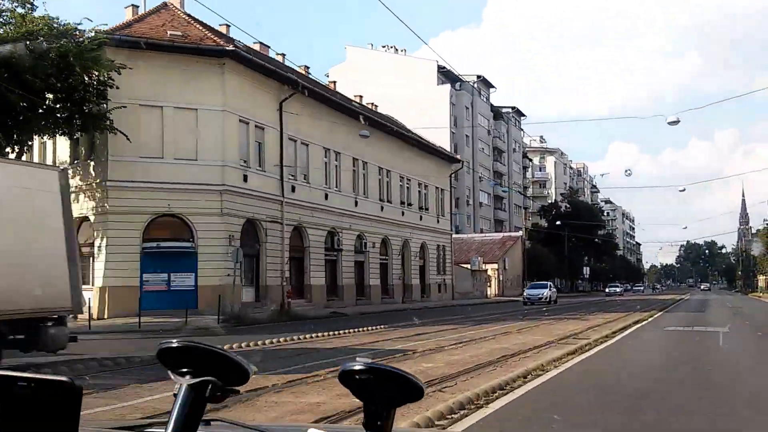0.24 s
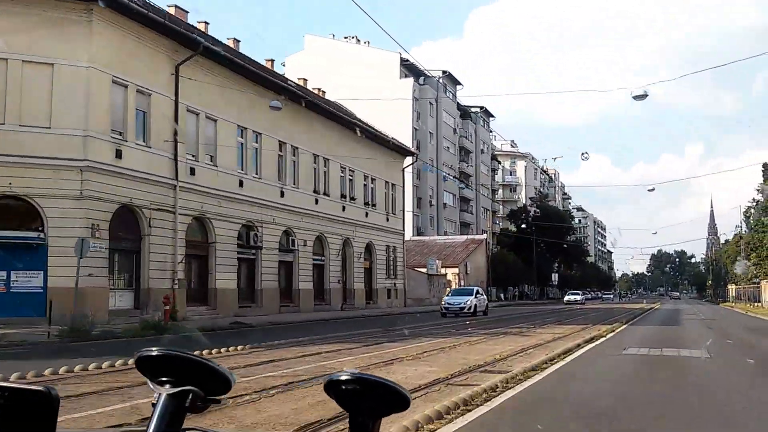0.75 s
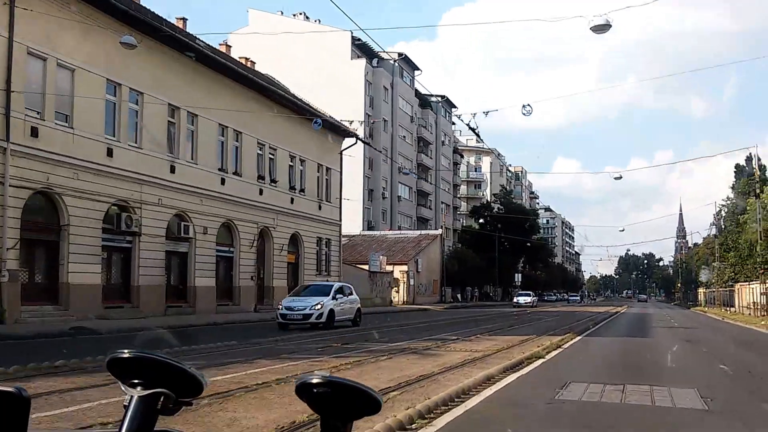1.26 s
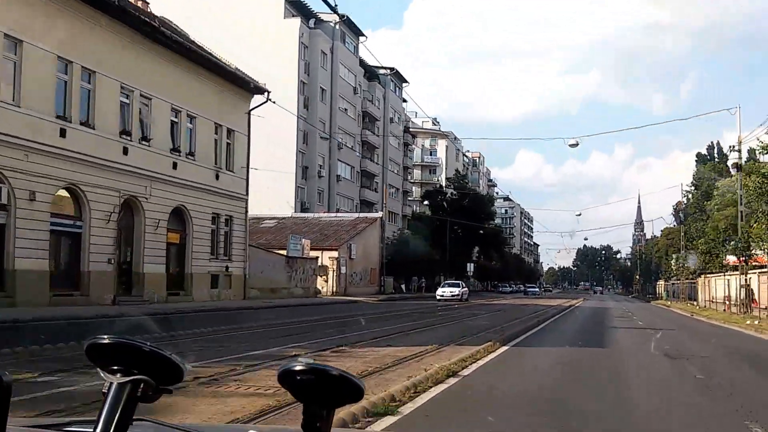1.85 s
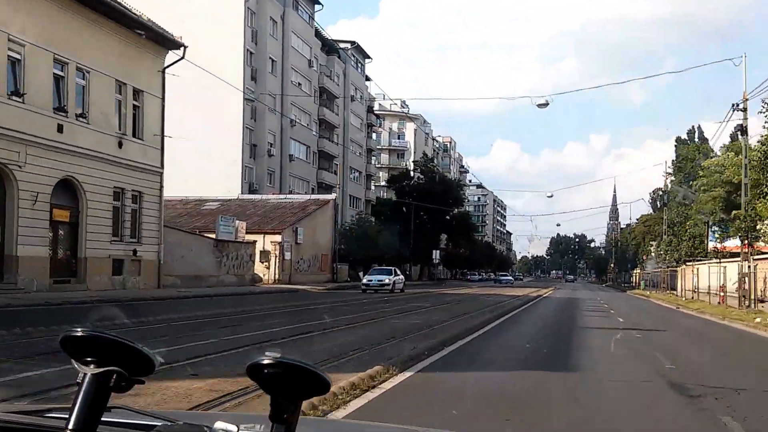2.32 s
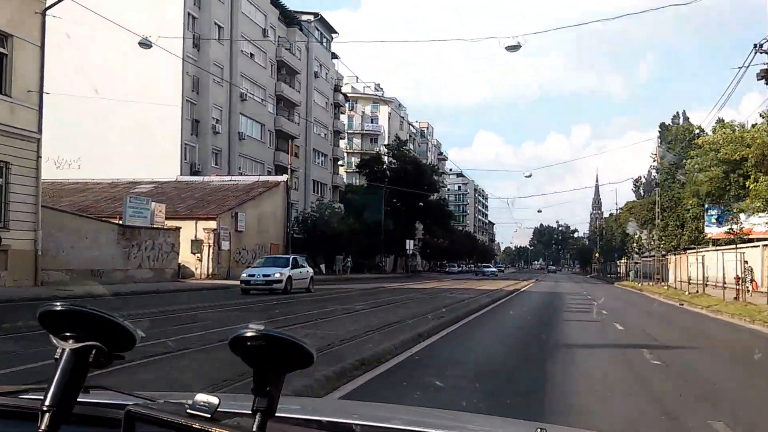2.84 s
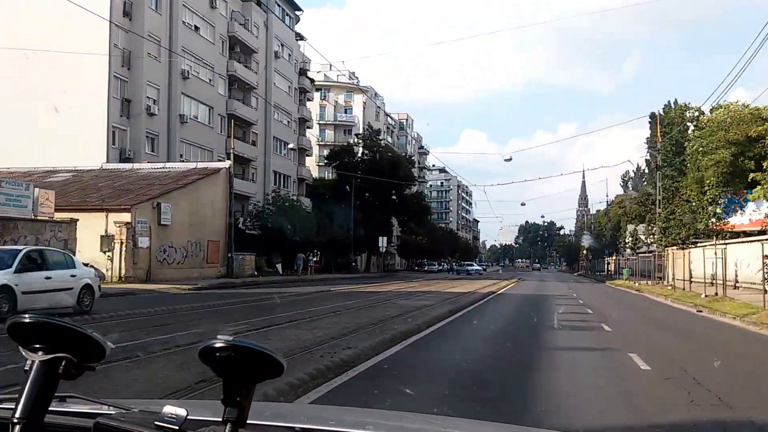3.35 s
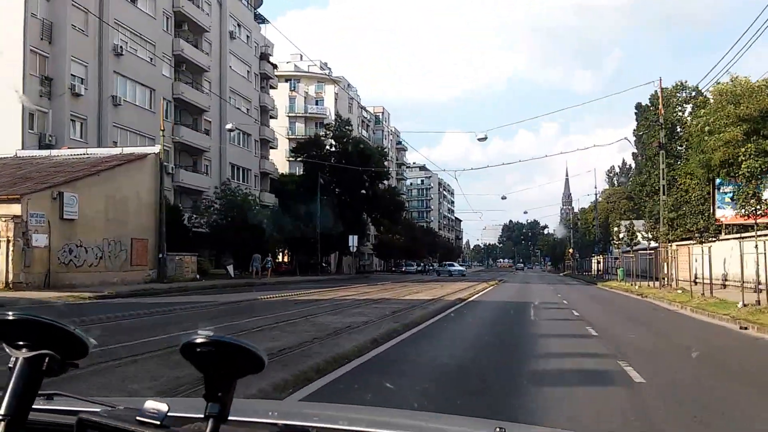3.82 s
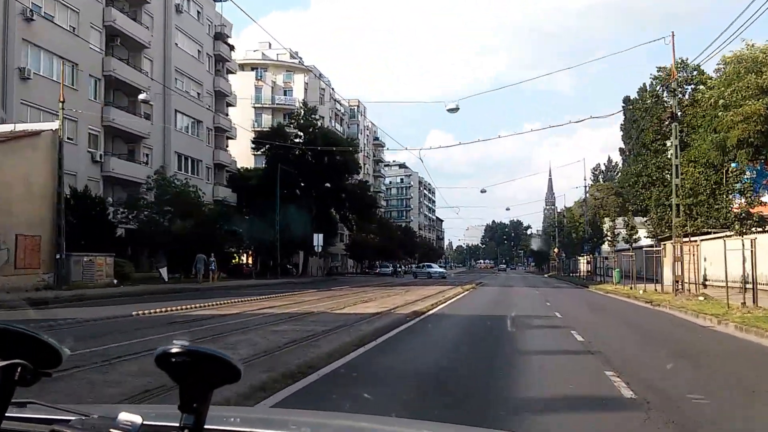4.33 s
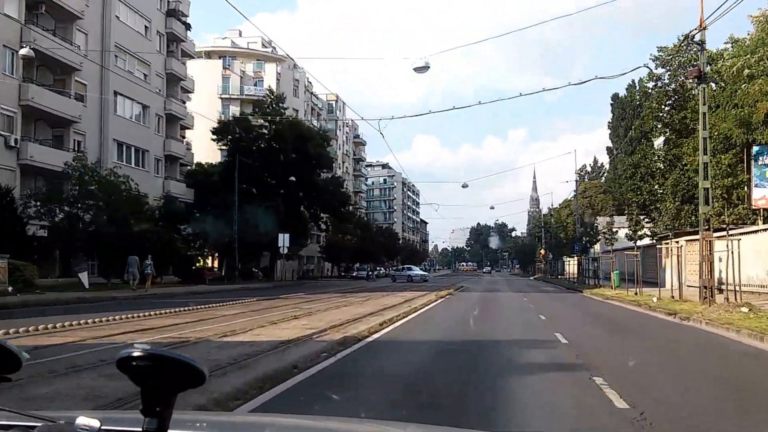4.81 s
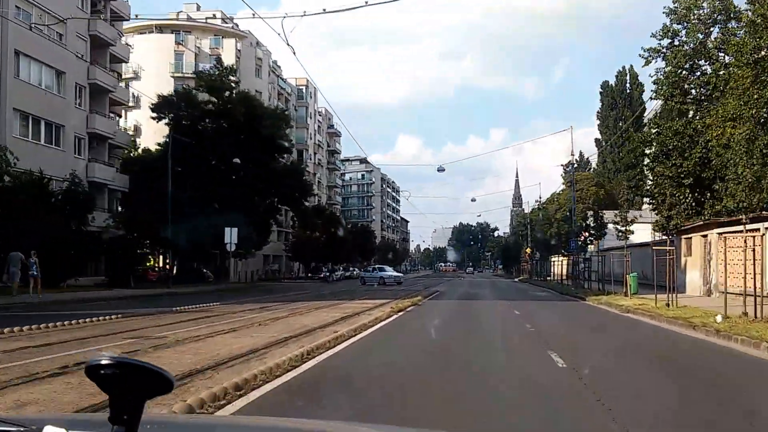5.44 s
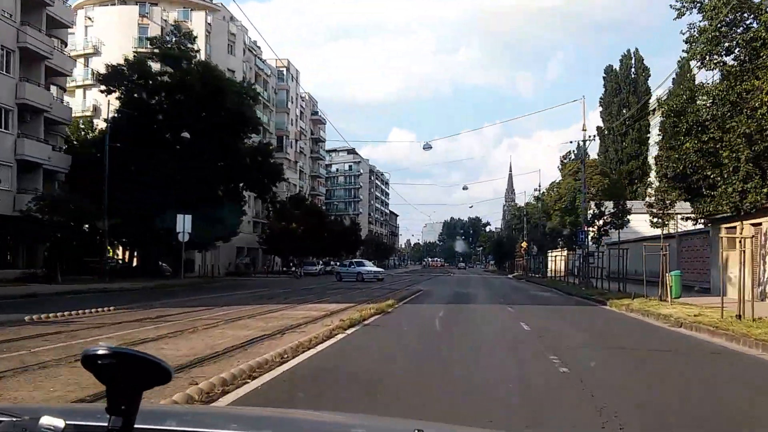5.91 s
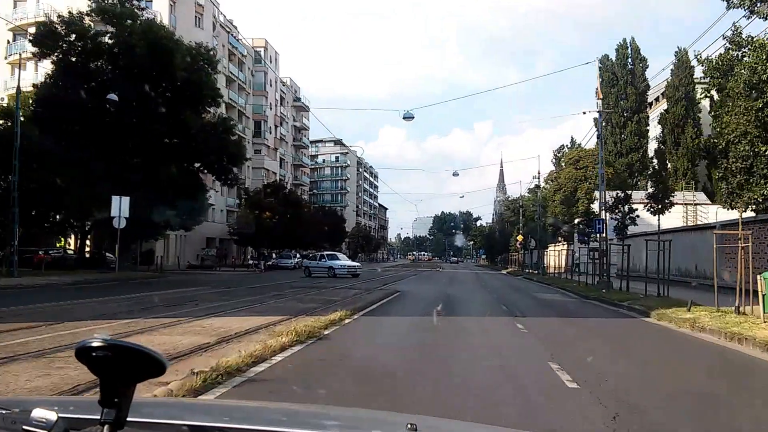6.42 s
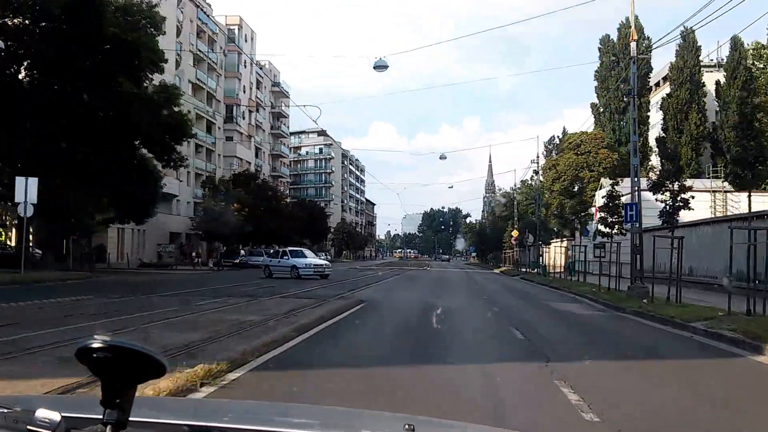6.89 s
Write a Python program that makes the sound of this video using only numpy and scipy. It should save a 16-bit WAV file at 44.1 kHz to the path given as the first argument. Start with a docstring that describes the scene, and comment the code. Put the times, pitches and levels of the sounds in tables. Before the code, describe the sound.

Deep, uneven road rumble and a humming engine fill the closed cabin of a car slowly gaining speed. Early on, the wheels thud over a rough patch, and the dashboard right by the microphone gives dry plastic clicks and a fine, high sizzle. After a calmer stretch, the engine works harder, its hum swelling with a faint whine, and a few last bumps shake the plastic again.

```python
"""Inside a car that gently gathers speed on a city street.
At first the four-cylinder engine hums while the road makes the body thud and the cabin boom.
At two seconds the throttle eases, and rough paving sets loose dashboard plastic rattling and sizzling.
From about five seconds the engine works harder and grows louder and busier.
Near the end, more bumps set the plastic rattling again."""
import sys
import numpy as np
from scipy import signal
from scipy.fft import rfft, irfft, next_fast_len
from scipy.io import wavfile
from scipy.ndimage import uniform_filter1d, map_coordinates

SR = 44100
rng = np.random.default_rng(int(sys.argv[2]) if len(sys.argv) > 2 else 0)


def file_out(sig):
    """Save sig as 16-bit WAV at sys.argv[1]."""
    # one column per channel
    cols = np.atleast_2d(sig).T
    # limit, then scale
    lim = np.clip(cols, -1, 1)
    pcm = np.round(lim * 32767).astype(np.int16)
    wavfile.write(sys.argv[1], SR, pcm)


N = 315756

# how often the cylinders fire: t/s, f/Hz
FIRING_RATE = [(0, 76.5), (.6, 77.88), (2, 80.15), (2.9, 80.45), (4.7, 82.56), (5, 83.38), (5.6, 85.2),
               (6.2, 88.2), (7.16, 90.98)]
# how hard the engine works: t/s, level/dB
ENGINE_LOAD = [(0, -1.5), (.55, 0), (1.7, 0), (2.2, -5.5), (2.85, -5.5), (3.5, -2.5), (4.85, -1.5),
               (5.5, 3), (7.16, 4.5)]
# the hum swells near these pitches, where the cabin rings: f/Hz, width/Hz, boost/dB
HUM_BOOSTS = [(86.74, 0.76, 7.5), (91.7, 2.1, 16)]
# higher tones above the hum: multiple of the firing rate, relative level/dB
OVERTONES = [(2, -2), (3, -10), (3.5, -10.5), (4, -11.5), (5, -17), (6.001, -20.5), (6.62, -14.5), (7, -19)]
# tone colour of the engine's moving parts: f/Hz, level/dB
GROWL_COLOUR = [(60, -120), (140, -42), (205, 3.5), (290, -2.5), (345, 0), (410, 3), (485, -0.5),
                (545, -4.5), (610, -4.5), (670, -13), (1200, -32), (2400, -36), (4500, -55.5),
                (12000, -120)]

def engine():
    """The firing cylinders hum; harder work brings up overtones and a pulsing growl."""
    firing_hz, = curves(FIRING_RATE)
    load_db, = curves(ENGINE_LOAD)
    phase = 2 * np.pi * np.cumsum(firing_hz * (1 + 0.0011 * wobble(9))) / SR
    hum_db = -27 + 0.48 * load_db + peaks_db(firing_hz, HUM_BOOSTS)
    hum = amp(hum_db + 1.8 * wobble(6.5)) * unit(np.sin(phase))
    # fuel burns unevenly, so each overtone wavers on its own
    tones = sum(amp(db + 2.06 * wobble(8)) * np.sin(k * phase + 0.24 * wobble(11))
                for k, db in OVERTONES)
    firing_pulse = 1 + 0.35 * np.cos(phase)
    growl = unit(noise(GROWL_COLOUR) * firing_pulse * amp(2.7 * wobble(25)))
    return hum + amp(-33 + load_db) * (amp(-1.5) * growl + tones) + belt_whine(phase)


# loudness of the whine: t/s, level/dB
WHINE_LEVEL = [(0, -39), (2.7, -48), (4.6, -45.5), (5.4, -37.5), (6.4, -37.5), (7.16, -51)]

def belt_whine(firing_phase):
    """A belt-driven part whines in step with the engine, along with a thin, breathy whistle."""
    whine_db, = curves(WHINE_LEVEL)
    pulley_ratio = 4.43
    whine_gain = amp(whine_db + 0.44 * wobble(7))
    whine = whine_gain * unit(np.sin(pulley_ratio * firing_phase + 0.63 * wobble(17)))
    whistle_colour = [(3290, -60), (4190, 0), (4790, 0), (5690, -60)]  # f/Hz, level/dB
    whistle = amp(whine_db - 34.5 + 2 * wobble(7)) * noise(whistle_colour)
    return whine + whistle


# how uneven the asphalt is: t/s, level/dB
UNEVENNESS = [(0, -3.5), (.35, 0.5), (.9, -2), (1.35, 2.5), (1.65, -2), (1.88, -1.5), (2.02, 5), (2.55, 2),
              (2.8, -5.5), (3.35, -7), (3.9, -3), (4.6, -5.5), (5.35, -5.5), (6.15, -0.5), (7.16, 2.5)]
# worn patches; wavy ones rock the body, coarse ones boom: t/s, length/s, shake/dB, boom/dB
WORN_PATCHES = [(0.045, 0.13, -30, -16), (0.212, 0.12, -21.5, -16), (0.613, 0.092, -32, -17),
                (1.066, 0.16, -20.5, -22.5), (1.775, .08, -19.5, -21.5), (2.084, 0.16, -13.5, -22),
                (2.298, 0.11, -16.5, -15.5), (2.859, 0.073, -17.5, -43), (3.038, 0.17, -21, -33),
                (3.601, 0.077, -25, -19), (4.12, .2, -28, -23.5), (6.329, .13, -25, -15.5),
                (6.79, 0.26, -32, -19)]
# tone colours of the shaking body and the booming cabin: f/Hz, level/dB
SHAKE_COLOUR = [(3, -65), (8, -51), (18, -43), (25, -4), (31, 3), (39, 1.5), (48, -1), (60, -2.5),
                (72, -13.5), (90, -22), (150, -87), (300, -120)]
BOOM_COLOUR = [(20, -120), (45, -42), (70, -4.5), (88, 0), (104, 2), (119, -3.5), (136, 1), (160, -5),
               (185, -10.5), (225, -21), (300, -23), (450, -35.5), (1200, -60), (3000, -120)]

def road_rumble():
    """Uneven asphalt shakes the car's body and booms in the cabin."""
    uneven_db, = curves(UNEVENNESS)
    wavy = bursts([(s, length, db) for s, length, db, _ in WORN_PATCHES], rise_s=0.02, fade_s=0.17)
    coarse = bursts([(s, length, db) for s, length, _, db in WORN_PATCHES], rise_s=0.02, fade_s=0.17)
    skim_db = 0.62 * np.arange(N) / SR  # as the car speeds up, it skims the unevenness
    shake_db = -20.5 + 1.27 * uneven_db - skim_db
    shake = np.hypot(amp(shake_db), wavy) * rumble(SHAKE_COLOUR, size=5000)
    boom_db = -21.5 + 0.97 * uneven_db + 1.9 * wobble(12)
    boom = np.hypot(amp(boom_db), coarse) * rumble(BOOM_COLOUR, size=3000)
    return shake + boom


# the wheels drop into dips in the paving: t/s, relative thud level/dB, relative clunk level/dB
DIPS = [(0.223, -12.5, -39), (0.679, -14, -46), (1.2, -8.5, -45), (1.42, -11, -36), (1.95, -3, -47),
        (2.028, -9.5, -38), (2.07, -18, -35.5), (2.1, -7.5, -30.5), (2.183, -13, -36), (2.232, -30, -38),
        (2.285, -20, -36.5), (2.308, -11, -47), (2.358, -14, -54), (2.525, -14, -46), (4.29, -13.5, -44),
        (5.021, -10, -43), (6.301, -14, -36), (6.773, -9.5, -32), (6.868, -18, -46)]
# tone colours of the tyre's thud and the suspension's clunk: f/Hz, level/dB
THUD_COLOUR = [(15, -120), (50, -10), (100, 8.5), (190, 1), (290, -10), (380, -17), (700, -57),
               (2000, -120)]
CLUNK_COLOUR = [(60, -120), (250, -11), (500, 0), (750, 5.5), (1100, 0), (1400, -17), (3000, -50),
                (9000, -120)]

def bumps():
    """Each dip thuds through the tyre, duller when it is gentle, and clunks in the suspension."""
    out, t = np.zeros(N + SR), np.arange(SR // 4) / SR
    rise = 1 - np.exp(-t / 0.0018)
    for s, thud_db, clunk_db in DIPS:
        dull_db = 0.83 * min(thud_db + 1, 0)
        dulled = [(hz, db + dull_db * (hz > 150)) for hz, db in THUD_COLOUR]
        thud = noise(dulled, len(t)) * amp(thud_db - 3 - 60 * t / 0.24)
        clunk = noise(CLUNK_COLOUR, len(t)) * amp(clunk_db + 2.5 - 60 * t / 0.11)
        out[round(s * SR):][:len(t)] += (thud + clunk) * rise
    return out[:N]


# a steady roar that dips just after the rough paving: t/s, level/dB
ROAR_LEVEL = [(0, -44.5), (1.4, -43), (2.15, -43.5), (2.4, -48), (2.85, -43.5), (5.4, -42.5), (7.16, -43)]
# its tone colour: f/Hz, level/dB
ROAR_COLOUR = [(350, -59), (650, -3), (790, 1.5), (870, 1), (955, 7), (1080, -2), (1240, -4.5), (1370, -5),
               (1600, -8.5), (1900, -10), (2350, -20), (2950, -25), (3600, -28.5), (6000, -38.5),
               (15000, -57)]

def tyre_roar():
    """The tread roars through the glass, fluttering as the grain of the road changes."""
    roar_db, = curves(ROAR_LEVEL)
    return amp(roar_db + 1.17 * wobble(30)) * patchy(noise(ROAR_COLOUR), depth_db=2.5)


# plastic parts knock together (relative levels): t/s, level/dB, fastener ring/dB, panel ring/dB
KNOCKS = [(1.9367, -20.5, 4, -14), (1.941, -30, -5, -5), (1.989, -29, -15, 6), (2.164, -28, -11, -2),
          (2.176, -29.5, -8, -11), (2.191, -31, -8, -5), (2.271, -32, -12, -3), (2.458, -31.5, 1, 1),
          (2.538, -36, 3, -14), (3.476, -45, -5, -5), (5.266, -42, -13, -16), (5.483, -43, -20, 7),
          (6.455, -41, -14, 6), (6.73, -39, -10, 5), (6.752, -36, -4, -1), (6.817, -36, -5, -4),
          (6.838, -38, -6, -2)]
# tone colour of the crack: f/Hz, level/dB
CRACK_COLOUR = [(300, -60), (900, -28), (2300, -1), (3200, -4), (4200, -11.5), (5100, -2), (6000, -6.5),
                (8000, 2.5), (10500, 6.5), (12300, 8), (14000, 6), (15700, -6)]
# notes of a small hard fastener and a loose panel: f/Hz, level/dB, time to fade by 60 dB/s
FASTENER_NOTES = [(9880, -7, .025), (10260, -8.5, 0.035), (10900, 0, .03), (11040, -1, 0.03),
                  (11600, -8, .035), (11760, -2, 0.053), (12900, -16, .035), (13620, -14, .035)]
PANEL_NOTES = [(2400, -3, .035), (3400, -10, .03), (4740, -8, 0.038), (5030, -4.5, 0.048), (5570, -5, .035),
               (6250, -3, 0.042), (7850, -15, .025)]

def dashboard_clicks():
    """Each knock is a dry plastic crack that briefly sets a fastener and a panel ringing."""
    out, t = np.zeros(N + SR), np.arange(SR // 8) / SR
    rise = 1 - np.exp(-t / 0.00047)
    snap = amp(-60 * t / 0.035) + amp(-17 - 60 * t / 0.13)  # a fast fade with a quiet tail
    for s, db, fastener_db, panel_db in KNOCKS:
        crack = noise(CRACK_COLOUR, len(t)) * snap
        fastener = amp(fastener_db - 1) * ringing(FASTENER_NOTES, t, spread=0.0016)
        panel = amp(panel_db - 11) * ringing(PANEL_NOTES, t, spread=0.0094)
        out[round(s * SR):][:len(t)] += amp(db - 3) * (crack + fastener + panel) * rise
    return out[:N]


# moments when the loose plastic chatters: t/s, length/s, level/dB
RATTLES = [(1.925, 0.12, -45), (2.16, 0.038, -46.5), (2.245, 0.027, -46.5), (2.36, 0.023, -47.5),
           (2.42, .085, -48.5), (6.735, .1, -51.5), (6.95, 0.13, -60.5)]
# tone colour of rubbing plastic: f/Hz, level/dB
RUB_COLOUR = [(300, -60), (1200, -10), (2400, 1), (3300, -1), (4200, -1), (5000, 0), (5700, -2), (7000, -7),
              (10000, -4), (12300, 7), (14000, -2), (15700, -12)]

def dashboard_rattle():
    """Shaken plastic chatters in tiny dry touches, each a short burst of rubbing."""
    touches_per_s = 450
    touches = (rng.random(N) < touches_per_s / SR) * rng.random(N) ** 2
    t = np.arange(SR // 20) / SR
    power = np.abs(signal.fftconvolve(touches, amp(-60 * t / 0.022) ** 2)[:N])
    chatter = unit(coloured(np.sqrt(power) * rng.standard_normal(N), RUB_COLOUR))
    return bursts(RATTLES, rise_s=0.0073, fade_s=0.29) * chatter


# moments when the sizzle swells: t/s, length/s, level/dB
SIZZLE_SWELLS = [(1, .35, -56.5), (1.9, 0.49, -44), (5.2, 1.5, -58.5), (6.35, 0.95, -49), (6.65, .55, -46)]
# its tone colour: f/Hz, level/dB
SIZZLE_COLOUR = [(2500, -15), (4000, -19), (5000, -18.5), (6200, -19), (7800, -11.5), (9800, -7.5),
                 (11300, -1.5), (12300, 1.5), (13000, -1.5), (14000, -8.5), (15700, -8.5)]

def dashboard_sizzle():
    """Loose plastic keeps up a fine, high sizzle that follows the road and swells now and then."""
    uneven_db, = curves(UNEVENNESS)
    sizzle = noise(SIZZLE_COLOUR) * amp(1.17 * wobble(45) + 0.7 * wobble(4.29))
    swells = bursts(SIZZLE_SWELLS, rise_s=0.34, fade_s=2.2)
    return np.hypot(amp(-59 + 0.15 * uneven_db), swells) * sizzle


# pitches that the cabin's air and glass lift or swallow: f/Hz, width/Hz, boost/dB
CABIN_PITCHES = [(223, 11, -1.5), (273.6, 18, 2.5), (320.6, 11.4, 4), (484, 25, -3.5), (556, 14, 7),
                 (604.5, 21, 5.5), (667, 34, -3), (692, 29, 5.5), (842, 63, -2), (848, 16, 4.5),
                 (926, 39, 1.5), (1295, 57, -5.5), (1330, 72, 4.5), (1480, 65, 1), (1596, 23, 7),
                 (1900, 27, 3), (2225, 120, -1.5), (2480, 75, 6), (2750, 120, -1), (2930, 100, 5.5),
                 (4800, 120, -5)]

def cabin(x):
    """The closed cabin makes some pitches louder and others quieter."""
    return filtered(x, lambda f: amp(peaks_db(f, CABIN_PITCHES)))


# tone colour of the hiss: f/Hz, level/dB
HISS_COLOUR = [(2000, -7.5), (4000, -7), (6000, -1), (8000, 5), (11000, 4), (15700, -36)]

def hiss():
    """The microphone adds a faint, steady hiss."""
    return amp(-62.5) * noise(HISS_COLOUR)


def amp(db):
    """Turn decibels into a number to multiply by."""
    return 10 ** (np.asarray(db) / 20)


def unit(x):
    """Scale x to an average power of 1."""
    return x / np.sqrt(np.mean(x ** 2) + 1e-20)


def curves(rows):
    """Join a table's points with lines: one curve for each column after the time."""
    times, *columns = np.transpose(rows)
    return [np.interp(np.arange(N) / SR, times, column) for column in columns]


def wobble(rate):
    """A smooth random curve through `rate` new values a second."""
    return map_coordinates(rng.standard_normal(int(N * rate / SR) + 4), [np.arange(N) * rate / SR])


def bursts(rows, rise_s, fade_s):
    """A loudness curve of events that rise, hold, then fall by 60 dB every fade_s."""
    t = np.arange(N) / SR
    gains = [np.clip((t - s) / rise_s, 0, 1) * amp(db - 60 * np.maximum(t - s - length, 0) / fade_s)
             for s, length, db in rows]
    return np.linalg.norm(gains, axis=0)


def peaks_db(f, peaks):
    """The total boost at frequency f from rounded peaks and hollows."""
    return sum(db / (1 + (2 * (f - hz) / width) ** 2) for hz, width, db in peaks)


def filtered(x, gain_at):
    """Multiply each frequency f in x by gain_at(f)."""
    n = x.shape[-1]
    padded = next_fast_len(n + 8192)
    return irfft(rfft(x, padded) * gain_at(np.fft.rfftfreq(padded, 1 / SR)), padded)[..., :n]


def coloured(x, colour):
    """Give x a tone colour: a table of how strong each frequency is."""
    hz, db = np.transpose(colour)
    return filtered(x, lambda f: amp(np.interp(np.log(f + 1), np.log(hz), db)))


def noise(colour, n=N):
    """n samples of noise with this tone colour and a power of 1."""
    return unit(coloured(rng.standard_normal(n), colour))


def rumble(colour, size):
    """Low noise with its loudness evened out over `size` samples."""
    x = noise(colour)
    power = uniform_filter1d(uniform_filter1d(x ** 2, size), size // 2)
    return unit(x / np.sqrt(np.abs(power) + 1e-6))


def patchy(x, depth_db):
    """Let small groups of pitches in x swell and fade on their own."""
    bands = signal.stft(x, nperseg=1024)[2]
    swells = uniform_filter1d(rng.standard_normal(bands.shape), size=4, axis=0)
    swells = uniform_filter1d(swells, size=6, axis=1)
    return unit(signal.istft(bands * amp(depth_db * unit(swells)), nperseg=1024)[1][:N])


def ringing(notes, t, spread):
    """A struck part's fading notes; where it is hit shifts their strength and (by spread) pitch."""
    out = np.zeros(len(t))
    for hz, db, fade_s in notes:
        shift, strength, phase = rng.standard_normal(3)
        tone = np.sin(2 * np.pi * (hz * (1 + spread * shift) * t + phase))
        out += amp(db + 2 * strength - 60 * t / fade_s) * tone
    return out


def scene():
    """Engine and road come through the cabin; the dashboard is right by the microphone."""
    driving = cabin(engine() + road_rumble() + tyre_roar() + bumps())
    dashboard = dashboard_rattle() + dashboard_sizzle() + dashboard_clicks()
    return (driving + dashboard + hiss())[None]


def record(dry):
    """Round off the loudest peaks and cut away the very highest pitches."""
    ceiling, top_hz = 0.85, 15750
    rounded = dry / (1 + (dry / ceiling) ** 8) ** (1 / 8)
    return filtered(rounded, lambda f: f < top_hz)


dry = scene()
out = record(dry)
file_out(out)
```